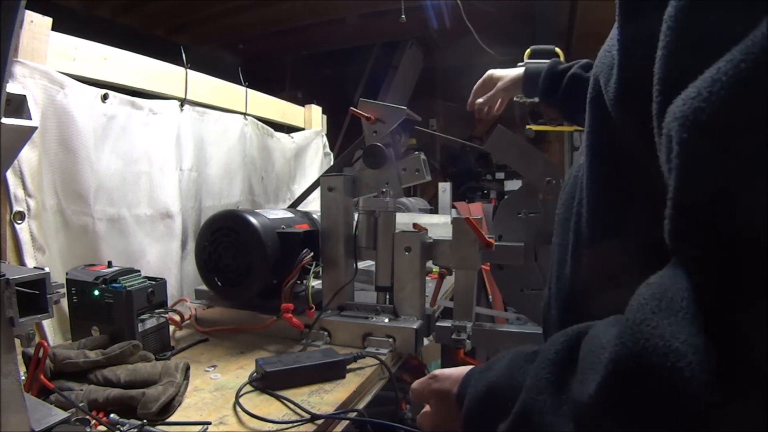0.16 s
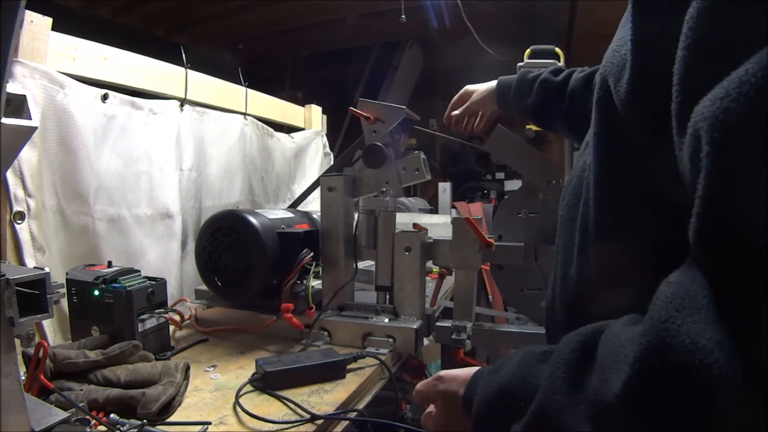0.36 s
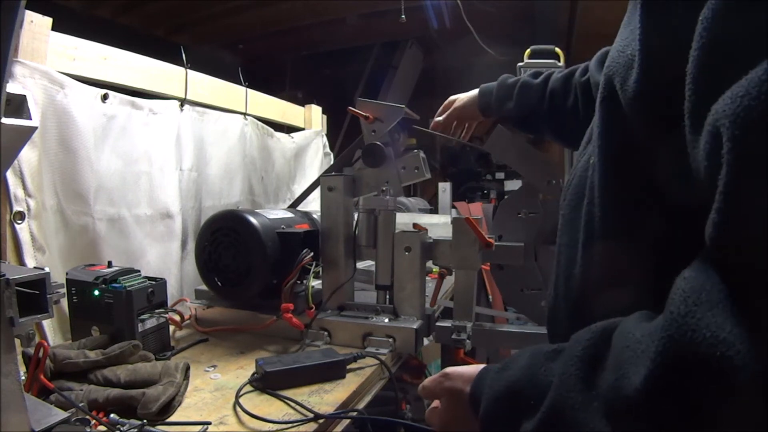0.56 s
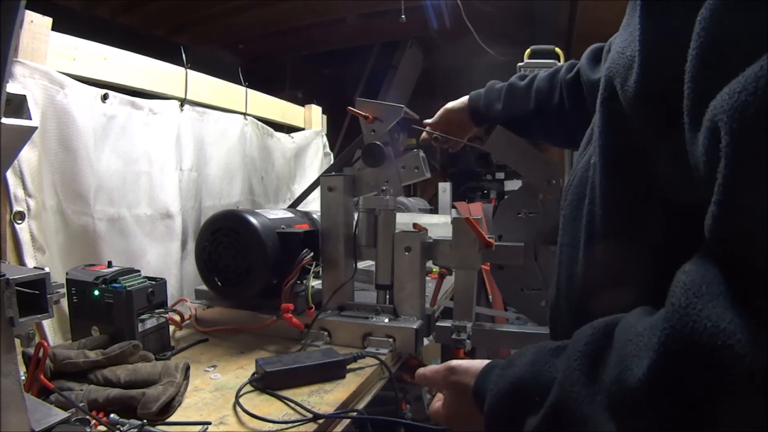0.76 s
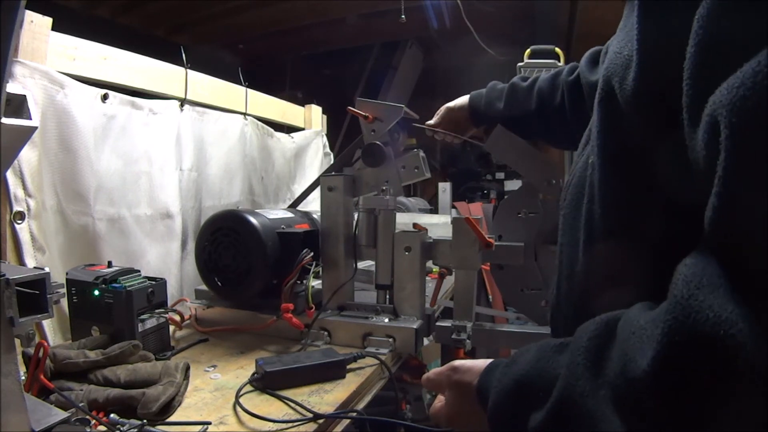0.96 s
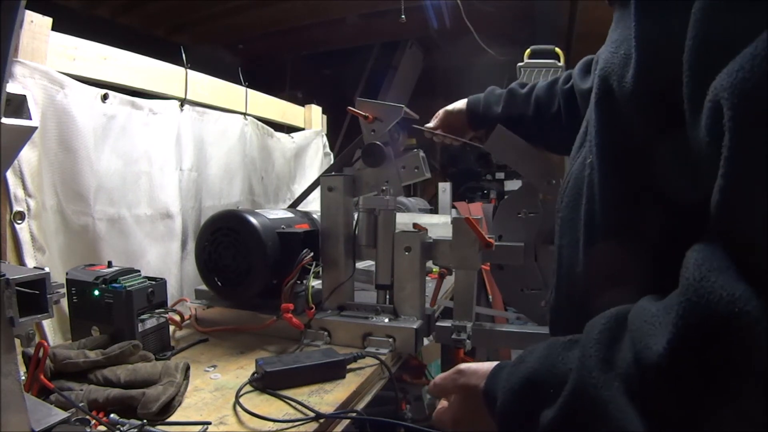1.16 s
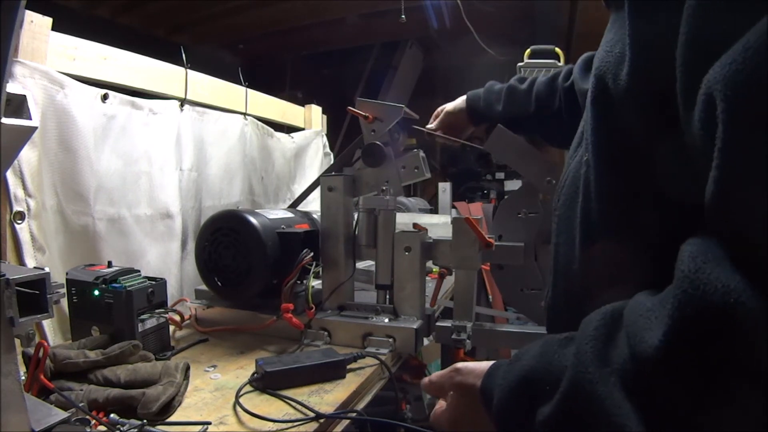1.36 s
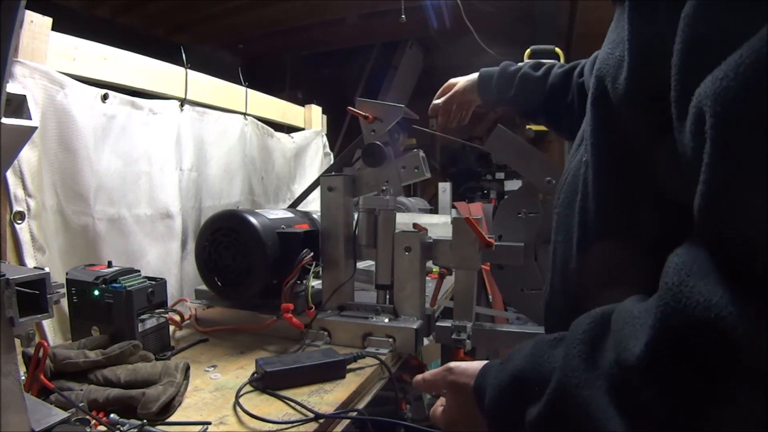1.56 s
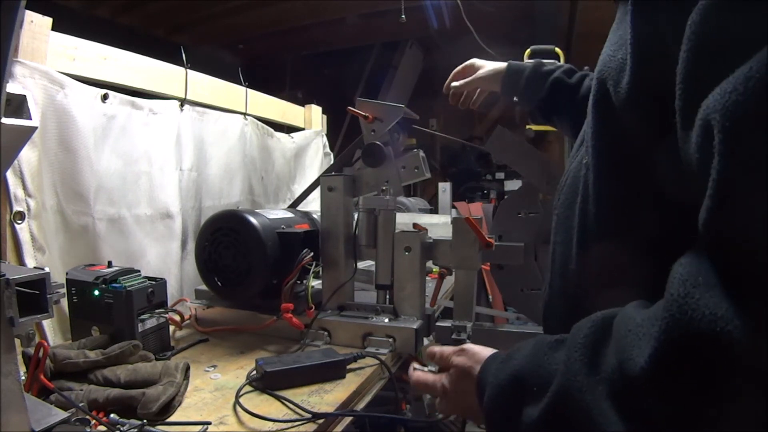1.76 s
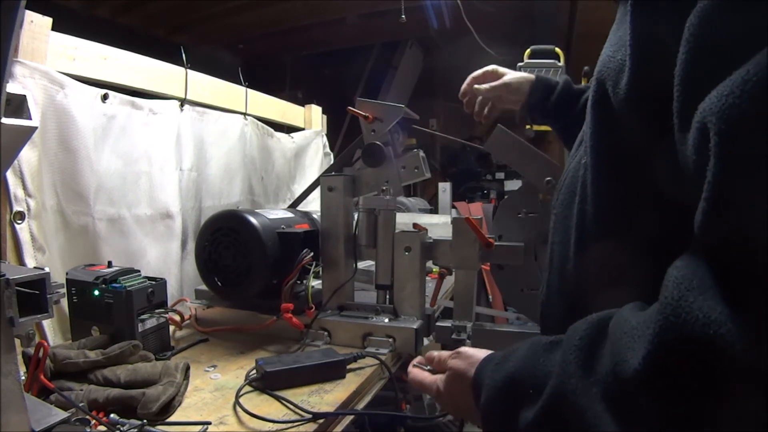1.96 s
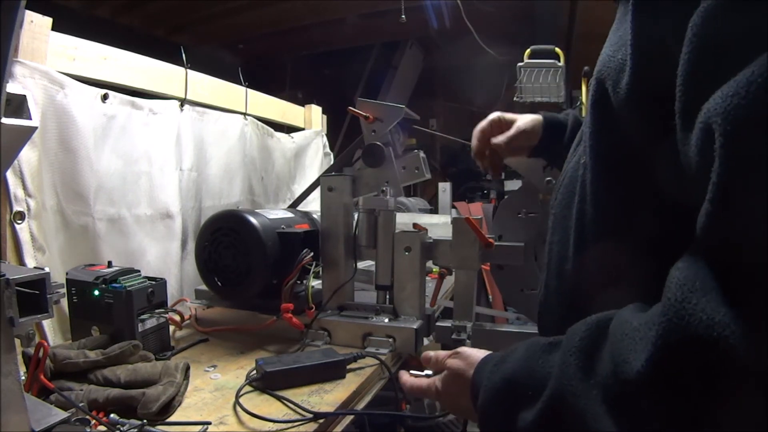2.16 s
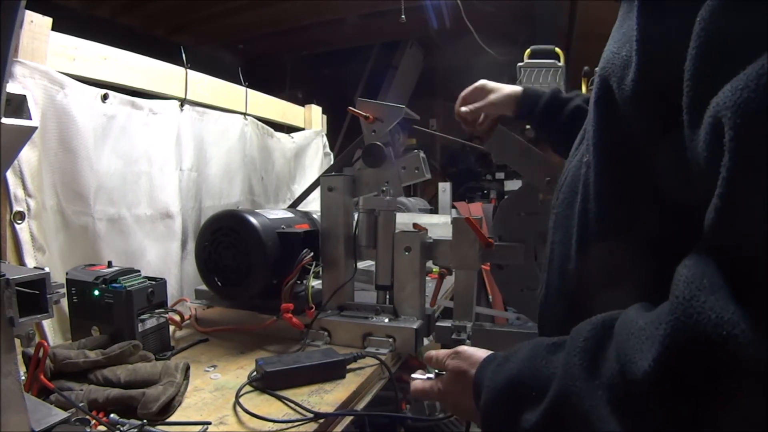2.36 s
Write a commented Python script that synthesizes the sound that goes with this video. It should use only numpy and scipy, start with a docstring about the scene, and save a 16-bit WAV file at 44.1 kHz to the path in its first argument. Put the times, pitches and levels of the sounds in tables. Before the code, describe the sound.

A small electric actuator starts with a tick at about 0.2 seconds and whirs with a high, buzzing whine, stopping on a sharp metallic click at 0.65. A sleeve swishes faintly near 1.4 seconds and a switch ticks at 1.7. A shorter, slightly softer whir runs from 2.0 to 2.15 seconds, with a click at each end. Quiet electrical hiss with thin tones continues throughout in the workshop.

```python
"""Over a quiet electrical hiss with thin tones, a grinder's small linear actuator whirs twice in a
workshop: a long push, then a short pull back. Its motor whines at multiples of the shaft speed while
brushes and gears buzz through the housing, pulsing twice a turn. Metal ticks and switch clicks mark
starts and stops, and the frame shudders under the push. Between the strokes a sleeve brushes past
and a switch clicks."""
import sys
import numpy as np
from scipy import signal
from scipy.fft import rfft, irfft
from scipy.io import wavfile

SR = 44100
rng = np.random.default_rng(int(sys.argv[2]) if len(sys.argv) > 2 else 0)


def wav_out(sig):
    """Save sig, one row per channel (or a flat mono array), as 16-bit PCM at SR to the path in sys.argv[1]."""
    wavfile.write(sys.argv[1], SR, np.round(np.clip(np.atleast_2d(sig).T, -1, 1) * 32767).astype(np.int16))


N = 105840
T = np.arange(N) / SR
FREQ = np.maximum(np.fft.rfftfreq(N, 1 / SR), 1)
RISE_S = .022  # the drive and the frame's shudder build over this time


def undb(db):
    """Decibels to gain."""
    return 10 ** (np.asarray(db) / 20)


def unit(x):
    """Scale to rms 1."""
    return x / np.sqrt(np.mean(x ** 2))


def gains(points):
    """Gain at every frequency from (Hz, dB) points."""
    hz, db = np.array(points, float).T
    return undb(np.interp(np.log(FREQ), np.log(hz), db))


def shape(x, response):
    """Filter by a frequency response."""
    return irfft(rfft(x) * response, N)


def noise(colour):
    """Coloured noise of rms 1."""
    return unit(shape(rng.standard_normal(N), gains(colour)))


def wander(rate_hz):
    """Smooth random drift of rms 1."""
    return unit(shape(rng.standard_normal(N), np.exp(-(FREQ / rate_hz) ** 2)))


def contact(at, db, decay):
    """Envelope of a short contact: instant attack, exponential fade."""
    return undb(db) * (T >= at) * np.exp(-np.maximum(T - at, 0) / decay)


def electrical_hiss():
    """A wide, steady bed of hiss with the thin, slightly wavering tones of idle electronics."""
    # Colour of the hiss. Each row: frequency in Hz, relative level in dB.
    colour = [(15, -51), (25, -13), (101, -9.5), (149, -9), (182, -5.5), (212, -10), (288, -9.5),
              (588, -10.5), (759, -11), (979, -14), (1140, -9.5), (1510, -13), (1630, -9), (1850, -14.5),
              (2390, -10.5), (2580, -4.5), (4070, -10), (4990, -9.5), (6610, -14), (9680, -16.5),
              (11000, -21), (14300, -108), (22000, -120)]
    # Stereo width. Each row: frequency in Hz, side level against the centre in dB.
    width = [(60, -12), (110, -5), (190, -3.5), (340, 2.5), (600, 5.5), (1080, 5.5), (1920, 2),
             (3420, -6.5), (6100, -5), (10900, -6)]
    # Idle tones. Each row: pitch in Hz, level in dB.
    idle_tones = [(1690, -75.5), (2536, -65.5), (2961, -70.5), (3806, -77), (4834, -76), (7171, -78)]
    hiss_db, waver_hz = -57.5, 2.88
    side = shape(noise(colour), gains(width))
    hiss = undb(hiss_db) * (noise(colour) + side * np.array([[1], [-1]]))
    tones = 0
    for hz, db in idle_tones:
        level = undb(db + 0.57 * wander(2.7))
        pitch = hz + waver_hz * wander(23.8)
        tones += level * np.sin(2 * np.pi * np.cumsum(pitch) / SR)
    return hiss + np.sqrt(2) * tones


def drive_ticks():
    """The drive takes up and releases, ringing the metal parts."""
    # Ticks. Each row: start in seconds, level in dB, decay in seconds.
    ticks = [(.226, -53, 0.0034), (.643, -31, 0.0035), (.648, -41.5, .003), (1.990, -41, 0.0046)]
    # Modes of the metal. Each row: pitch in Hz, relative level in dB.
    modes = [(2950, -13), (4620, -7), (4860, 0.5), (6050, -13)]
    ring = sum(undb(db) * np.sin(2 * np.pi * (hz * T + rng.random())) for hz, db in modes)
    return np.sqrt(2) * ring * sum(contact(*tick) for tick in ticks)


def switch_clicks():
    """Bright snaps, each a dying burst of noise in one broad resonance."""
    # Snaps. Each row: start in seconds, level in dB, decay in seconds, centre in Hz.
    snaps = [(.226, -49, 0.0081, 8000), (.647, -38.5, 0.0053, 7840), (1.742, -48.5, 0.0034, 9300),
             (1.987, -47, 0.0074, 7750), (2.133, -37.5, .002, 7500)]
    width_hz = 960
    s = 1j * FREQ
    clicks = 0
    for at, db, decay, hz in snaps:
        burst = contact(at, db, decay) * rng.standard_normal(N)
        resonance = s / (s * s + s * width_hz + hz ** 2)
        clicks += shape(burst, resonance * np.sqrt(width_hz * SR / np.pi))  # unit power gain
    return clicks


def housing(direction):
    """Ringing response of the actuator's case, with unit power gain."""
    # Case resonances. Each row: centre in Hz, width in Hz, relative push and pull levels in dB.
    resonances = [(1277, 61, -7.5, -15.5), (1788, 208, -6.5, -14), (2087, 270, -19, -16.5),
                  (2345, 30, -25, -34), (2918, 256, 1.5, -7), (3123, 79, -16, -20.5),
                  (4560, 263, -5.5, 0.5), (5046, 302, -1.5, 4), (5510, 274, -14, -7), (5960, 230, -13, -2),
                  (6410, 116, -4.5, -2), (7460, 1300, -15, -4), (8340, 1450, -16.5, -12)]
    low_cut_hz, high_cut_hz = 930, 8300
    s = 1j * FREQ
    ring = sum((-1) ** k * undb(db[direction]) * s * width / (s * s + s * width + hz ** 2)
               for k, (hz, width, *db) in enumerate(resonances))
    low, high = s / low_cut_hz, s / high_cut_hz
    ring *= low ** 2 / (1 + low + low ** 2)
    ring /= 1 + np.sqrt(2) * high + high ** 2
    return ring / np.sqrt(np.mean(abs(ring) ** 2))


def gears_and_brushes(direction, turns):
    """Teeth and brushes scrape over the same bumps every turn: a low and a high buzz in the case."""
    harmonics, points_per_turn = 88, 4096
    pulse_depth, split_hz = 0.47, 4140  # gears sound below the split, brushes above
    spectrum = np.r_[0, np.exp(2j * np.pi * rng.random(harmonics))]
    one_turn = np.tanh(2 * unit(irfft(spectrum, points_per_turn)))  # bumps alike in height
    bumps = unit(np.interp(turns % 1, np.arange(points_per_turn) / points_per_turn, one_turn))
    pulsing = np.exp(pulse_depth * np.cos(2 * np.pi * 2 * turns))
    rub = pulsing * (bumps + rng.standard_normal(N))
    case = housing(direction)
    gear_band = 1 / (1 + (FREQ / split_hz) ** 10)
    return shape(rub, case * gear_band), shape(rub, case * (1 - gear_band))


def motor_whine(direction, turns):
    """Fluttering partials locked to the turning shaft."""
    # Partials. Each row: multiple of the shaft speed, relative push and pull levels in dB.
    partials = [(5, -29.5, -15), (10, -14.5, -16), (14, -24.5, -25), (15, -27, -22), (20, -16.5, -20),
                (25, -16.5, -25), (40, -9.5, -27)]
    flutter_db = 1.5
    whine = 0
    for multiple, *db in partials:
        level = undb(db[direction] + flutter_db * wander(37))
        whine += level * np.sin(2 * np.pi * (multiple * turns + rng.random()))
    return np.sqrt(2) * whine


def stroke(direction, start, stop, db, shaft_hz, sag):
    """The motor spins up, runs against its load and brakes. Direction 0 pushes, 1 pulls."""
    # Loudness curves, push then pull. Each row: time in seconds, treble and gear levels in dB
    # before the stroke's trim.
    effort = [
        [(.25, -42, -48.5), (.315, -41.5, -44.5), (.335, -45.5, -47.5), (.36, -39, -47), (.44, -41.5, -47),
         (.51, -39.5, -44.5), (.59, -40, -44.5), (.615, -41, -43)],
        [(2.0, -44, -39), (2.018, -43, -46), (2.055, -46, -46.5), (2.095, -45.5, -48), (2.13, -46, -47)],
    ]
    spin_up_s, whine_rise_s, coast_s, jitter = .010, 0.031, 0.0064, .003
    age = np.clip(T - start, 0, stop - start)
    coast = np.exp(-np.maximum(T - stop, 0) / coast_s)
    spin_up = 1 - .3 * np.exp(-age / spin_up_s)
    braking = 1 - .03 * (1 - coast)
    speed = (shaft_hz - sag * age) * spin_up * braking
    turns = np.cumsum(speed * (1 + jitter * wander(53))) / SR

    gears, brushes = gears_and_brushes(direction, turns)
    whine = motor_whine(direction, turns) * np.minimum(age / whine_rise_s, 1)
    running = (T > start) & (T < stop)
    times, treble_db, gear_db = np.array(effort[direction]).T
    body = undb(np.interp(T, times, gear_db)) * gears / gears[running].std()
    treble = undb(np.interp(T, times, treble_db)) * (brushes / brushes[running].std() + whine)
    drive = undb(db) * np.minimum(age / RISE_S, 1) * coast
    return drive * (body + treble)


def actuator():
    """A long push that sags in pitch, then a short pull that climbs."""
    # Strokes. Each row: start and stop in seconds, trim in dB, shaft speed in Hz, sag in Hz per second.
    strokes = [(.230, .651, -1.5, 127.8, 13), (1.998, 2.138, -1.5, 130, -17)]
    return sum(stroke(direction, *row) for direction, row in enumerate(strokes))


def frame_shudder():
    """The frame rings low and unevenly as the push takes hold."""
    # Shudders. Each row: start in seconds, level in dB, decay in seconds.
    shudders = [(0.269, -63, 0.1)]
    frame_hz, waver_hz = 160, 17.8
    pitch = frame_hz + waver_hz * wander(24)
    ring = np.sqrt(2) * np.sin(2 * np.pi * np.cumsum(pitch) / SR)
    return ring * sum(contact(at, db, decay) * np.clip((T - at) / RISE_S, 0, 1)
                      for at, db, decay in shudders)


def sleeve():
    """Cloth brushes past in one brief, grainy swish."""
    # Colour of the cloth. Each row: frequency in Hz, relative level in dB.
    colour = [(500, -28), (2000, -16), (3500, 5.5), (6000, 0), (8500, 1), (11000, -24)]
    peak_s, half_width_s, level_db = 1.369, 0.018, -55.5
    swell = 1 / (1 + ((T - peak_s) / half_width_s) ** 2)
    return noise(colour) * undb(level_db + wander(120)) * swell


def workshop(x):
    """Direct sound plus a short diffuse tail, different at each ear."""
    # Colour of the reflections. Each row: frequency in Hz, level against the direct sound in dB.
    reflections = [(300, 3.5), (650, -2), (1300, -3), (2800, -5.5), (5000, -13.5), (9000, -7)]
    # Stereo balance. Each row: frequency in Hz, left over right in dB.
    balance = [(60, 15), (110, -12), (190, 7), (340, 22), (600, 5.5), (1080, -7.5), (1920, -1), (3420, 0.0),
               (6100, -1.5), (10900, 0)]
    t60_s, predelay_s = 0.37, 0.00468
    tail = rng.standard_normal((2, N)) * (T > predelay_s) * np.exp(-np.log(1000) * T / t60_s)
    tail /= np.sqrt(np.sum(tail ** 2, axis=1, keepdims=True))
    wet = rfft(tail) * gains(reflections)
    lean = np.sqrt(gains(balance))
    return shape(x, (1 + wet) * np.array([lean, 1 / lean]))


def scene():
    """The machine and the sleeve sound in the room; hiss and shudder stay dry."""
    in_room = drive_ticks() + switch_clicks() + actuator() + sleeve()
    return electrical_hiss() + workshop(in_room) + frame_shudder()


def record(dry):
    """A steep low-pass takes the air off the top."""
    top_hz = 11020
    return signal.sosfilt(signal.ellip(12, .2, 80, top_hz, fs=SR, output="sos"), dry)


dry = scene()
out = record(dry)
wav_out(out)
```